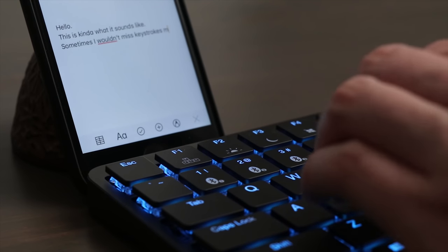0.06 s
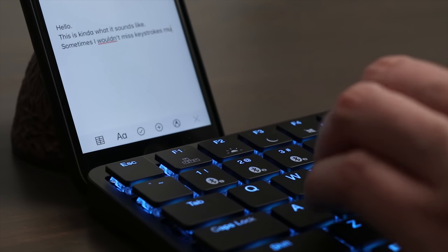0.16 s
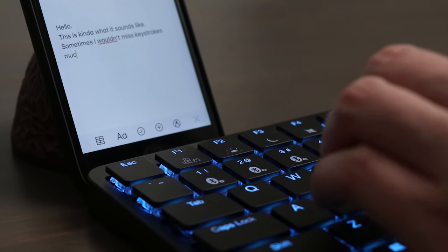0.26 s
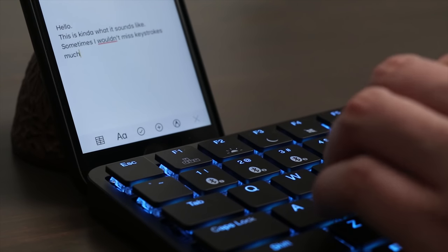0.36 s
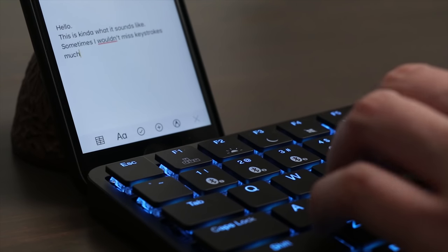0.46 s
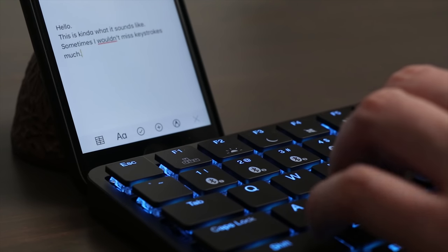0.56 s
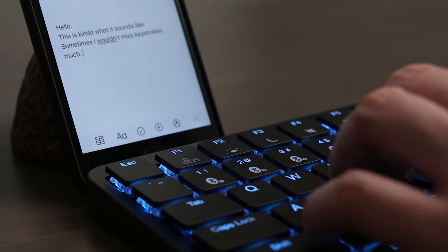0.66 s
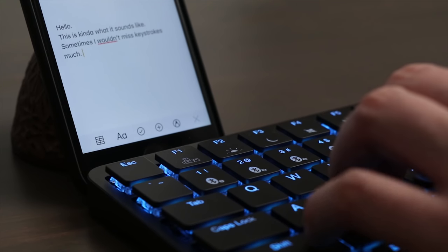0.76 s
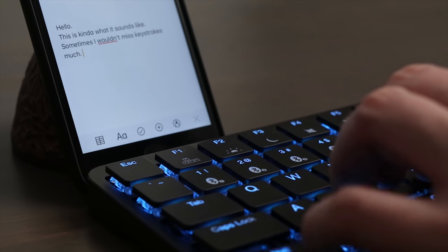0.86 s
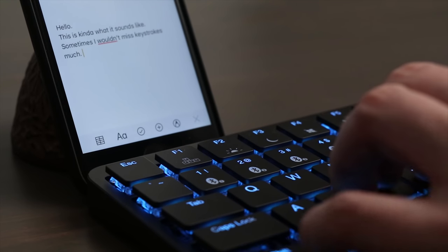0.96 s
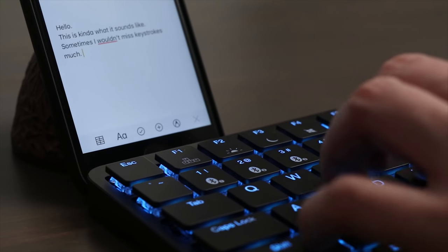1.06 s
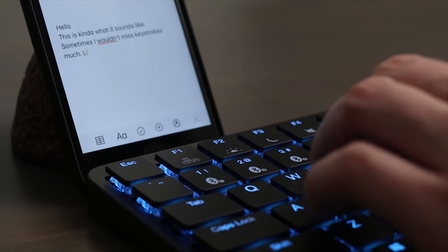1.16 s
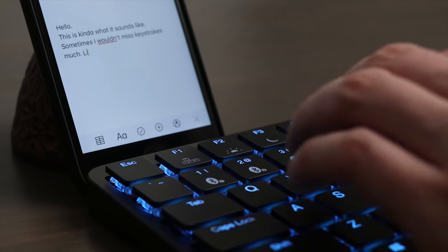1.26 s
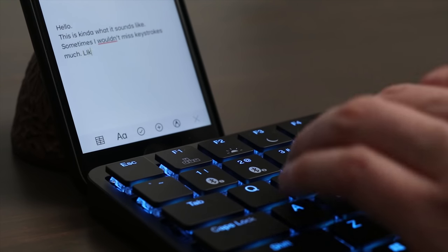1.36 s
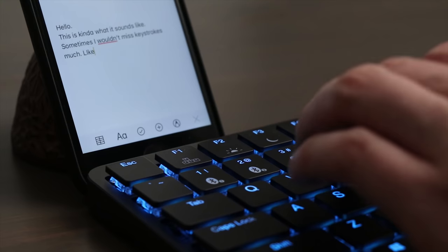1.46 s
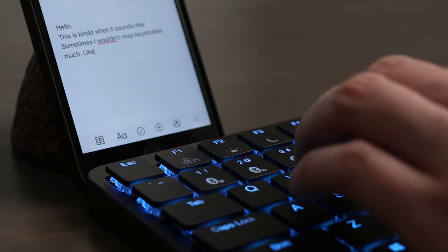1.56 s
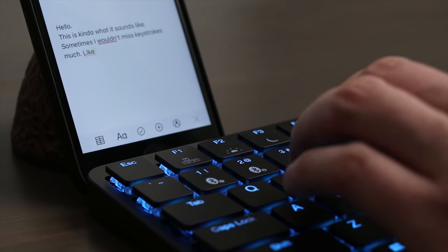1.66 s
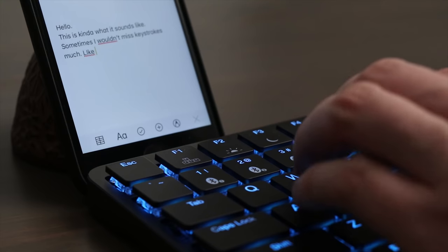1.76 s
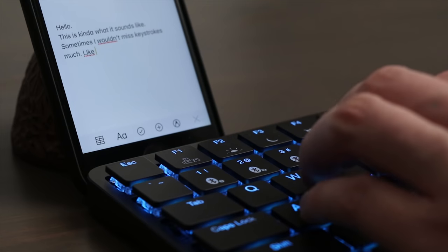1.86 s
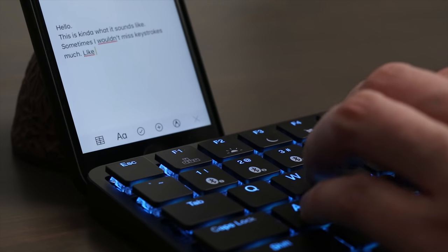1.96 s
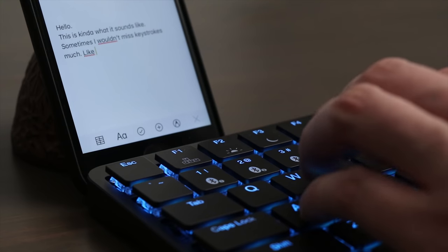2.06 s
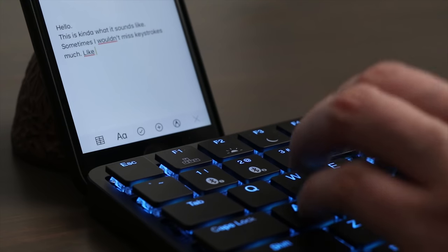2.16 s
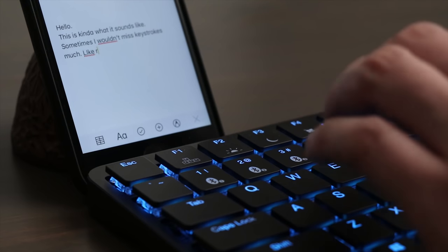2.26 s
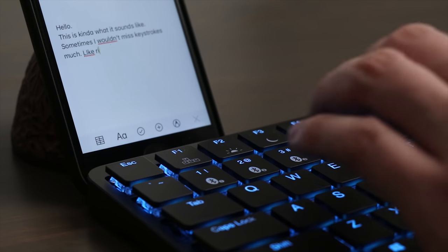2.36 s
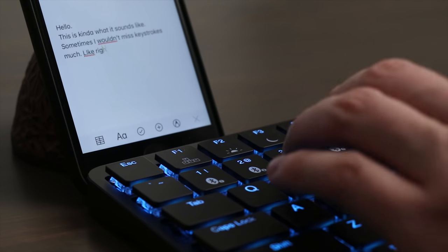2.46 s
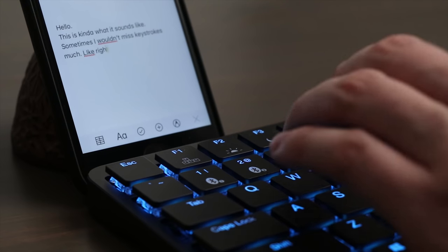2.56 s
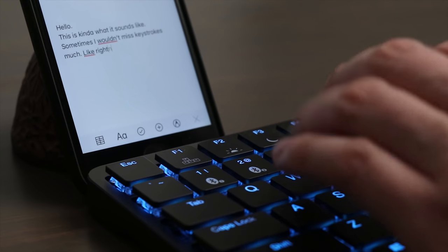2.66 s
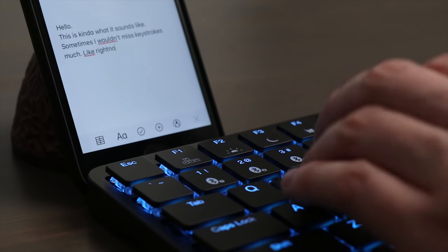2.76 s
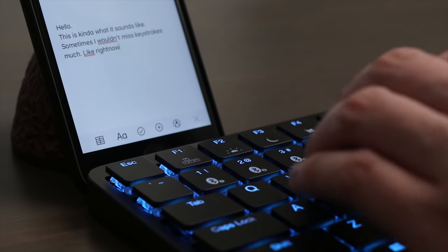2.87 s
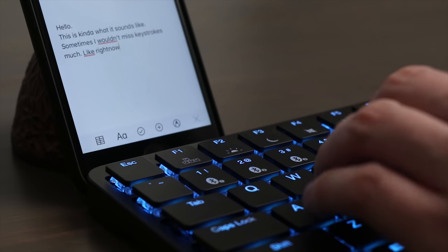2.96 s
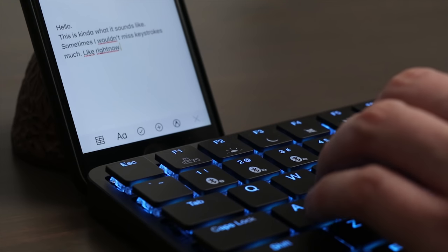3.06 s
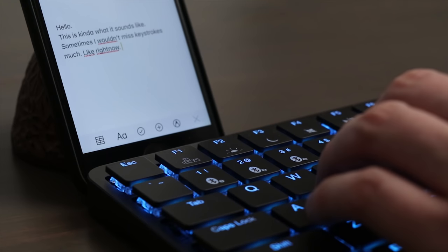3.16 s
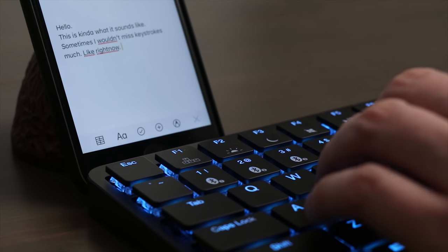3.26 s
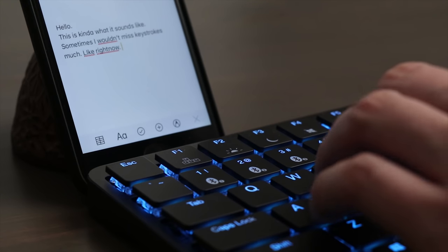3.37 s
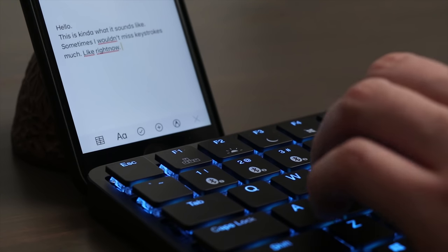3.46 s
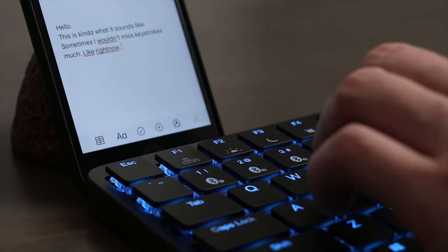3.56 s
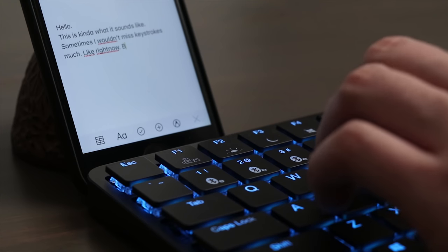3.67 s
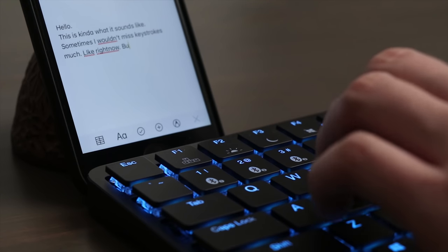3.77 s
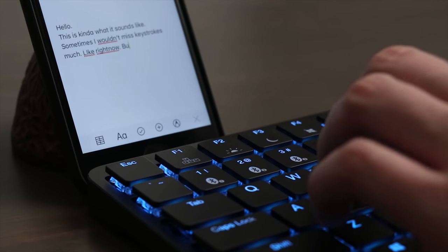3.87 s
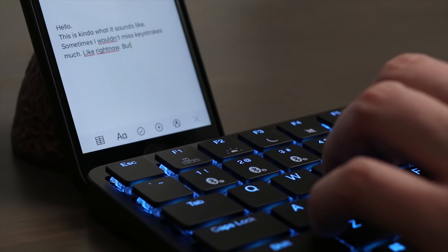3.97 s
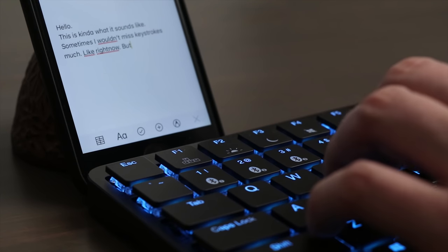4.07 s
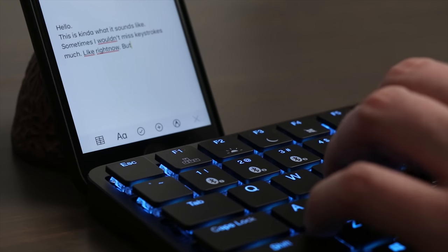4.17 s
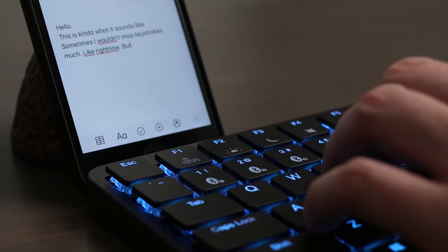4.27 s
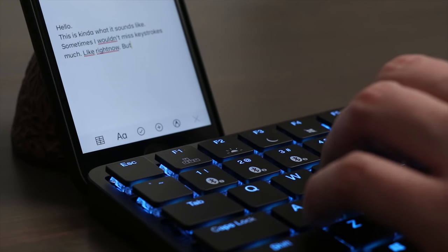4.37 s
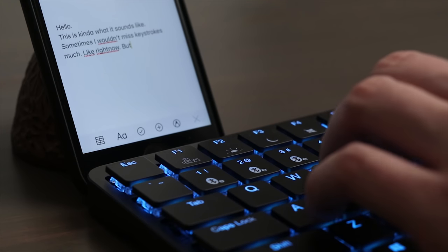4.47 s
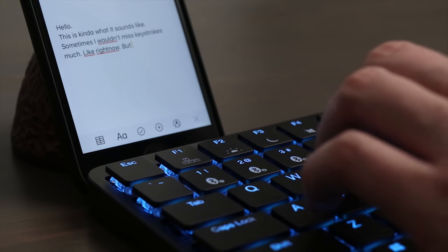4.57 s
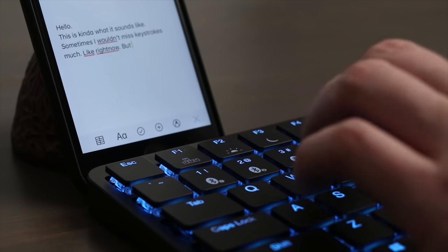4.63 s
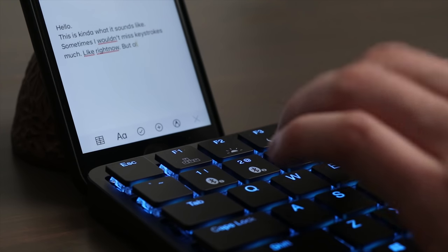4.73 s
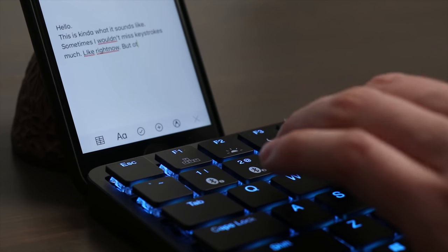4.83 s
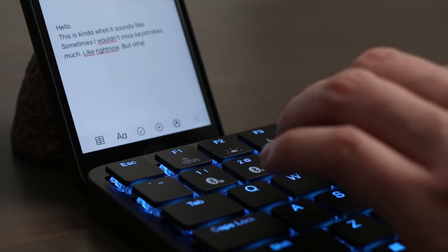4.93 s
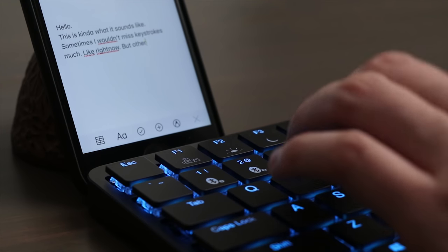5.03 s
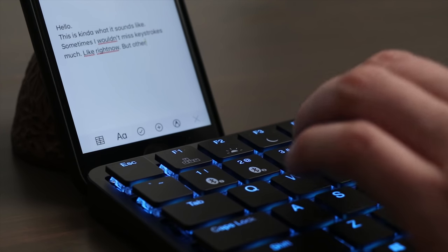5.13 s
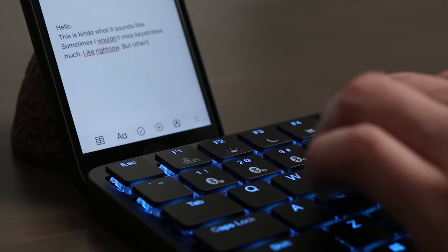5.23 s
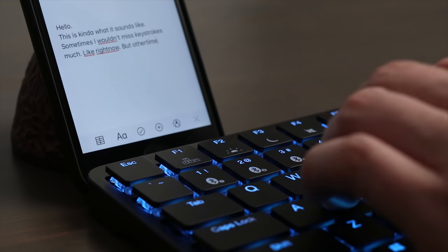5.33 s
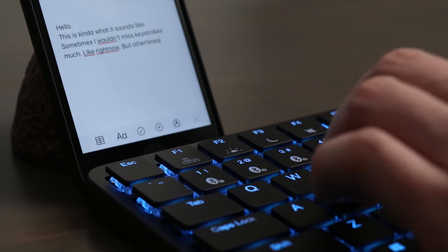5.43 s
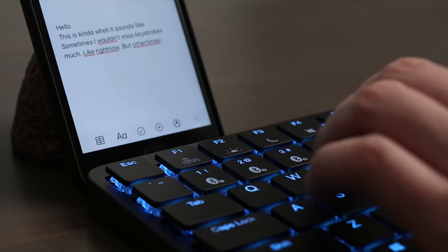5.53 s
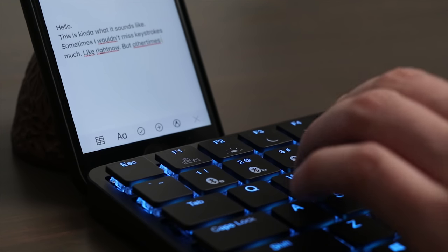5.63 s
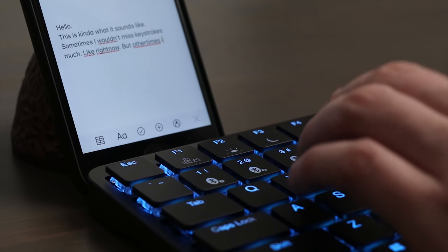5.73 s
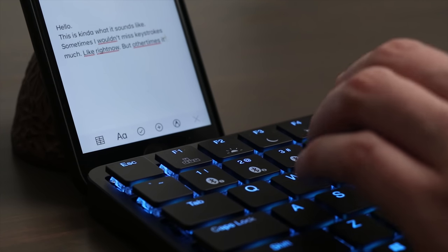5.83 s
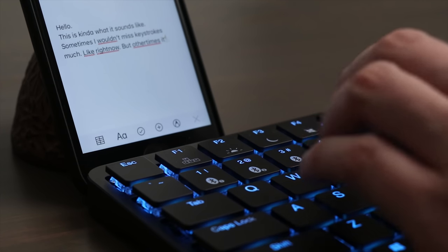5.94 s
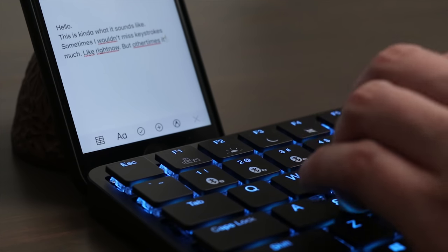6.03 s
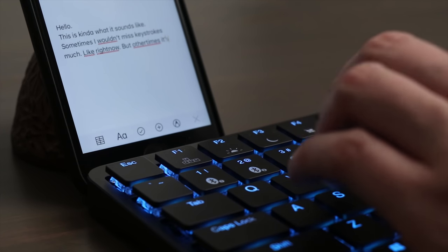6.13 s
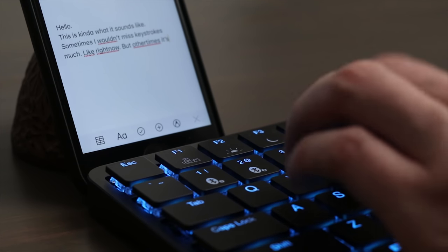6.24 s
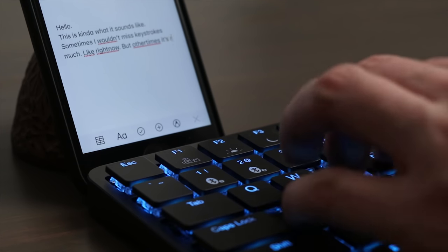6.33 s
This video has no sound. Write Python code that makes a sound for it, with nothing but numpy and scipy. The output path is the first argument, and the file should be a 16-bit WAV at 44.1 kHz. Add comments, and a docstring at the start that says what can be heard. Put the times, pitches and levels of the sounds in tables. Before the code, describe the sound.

A clicky keyboard is typed quickly in a quiet room. Bright snaps and plastic clacks start at once, pause briefly, then return in dense clusters, with doubled clicks as keys go down and spring back. After gaps in the middle, a long busy run leads to the end. Faint spring pings and a thin wire ring linger under the close, central, slightly roomy sound.

```python
"""Fast typing on a clicky keyboard

Keys are struck on a small keyboard on a desk, close to a nearly mono microphone in a quiet room.
Each stroke is a cluster a few ms apart: the click leaf snaps, the keycap knocks, the desk thumps.
These are struck bodies, summed from decaying modes; springs and the wire of a long key ring longer.
Noise tails excited by the blows give the rattle of loose parts and the short reverberation."""
import sys
import numpy as np
from scipy import signal
from scipy.fft import rfft, irfft
from scipy.io import wavfile
from scipy.ndimage import uniform_filter1d

SR = 44100
rng = np.random.default_rng(int(sys.argv[2]) if len(sys.argv) > 2 else 0)


def output_pcm(signal):
    """Save a mono or channel-first signal as 16-bit PCM at the path in sys.argv[1].

    Samples are clipped to [-1, 1] before scaling.
    """
    pcm = np.clip(np.atleast_2d(signal).T, -1, 1) * 32767
    wavfile.write(sys.argv[1], SR, np.round(pcm).astype(np.int16))


N = 282240  # samples


def gain_of(db):
    """Level law: decibels become an amplitude factor."""
    return 10 ** (np.asarray(db) / 20)


def read(points, hz):
    """Logarithmic frequency scale: a table is interpolated along it."""
    f, value = np.transpose(points)
    return np.interp(np.log(hz + 1), np.log(f + 1), value)


def add(mix, s, sound):
    """Superposition: a sound is summed into the mix from a time in seconds."""
    part = mix[max(round(s * SR), 0):][:len(sound)]
    part += sound[:len(part)]


def coloured(x, spectrum):
    """Linear filtering: each frequency is weighted by a spectrum."""
    weight = gain_of(read(spectrum, np.fft.rfftfreq(N, 1 / SR)))
    return irfft(rfft(x) * weight, N)


def ring(modes, chance, seconds, rise_s, spread, loose_db):
    """Modal decay: a blow excites modes varied in pitch, strength and phase; loudest moment at rms 1."""
    hz, db, t60 = np.transpose(modes)[:, :, None]
    detune, strength, phase = chance[:3 * len(modes)].reshape(3, -1, 1)
    t = np.arange(round(seconds * SR)) / SR
    cycles = hz * (1 + spread * (2 * detune - 1)) * t + phase
    level_db = db + loose_db * (2 * strength - 1) - 60 * t / t60
    sound = (gain_of(level_db) * np.sin(2 * np.pi * cycles)).sum(0)
    sound *= (1 - np.exp(-t / rise_s)) ** 2  # contact takes a moment to build
    power = uniform_filter1d(sound ** 2, size=round(4 * rise_s * SR) + 20)
    return sound / np.sqrt(power.max())


# Room and microphone noise, shape only: (frequency [Hz], relative density [dB per Hz])
AIR_SPECTRUM = [(20, 5.5), (50, 2.5), (100, -4), (220, -3), (500, -12.5), (1200, -20), (3000, -22.5),
                (5900, -23), (6350, -21), (6800, -24), (12000, -23.5), (15500, -25.5)]
AIR_DB, HISS_DB = -65, -75.5  # rms: noise shared by the channels, hiss that differs between them


def air():
    """Stationary noise: a coloured part alike in both channels, and white hiss of opposite sign in each."""
    noise, hiss = coloured(rng.standard_normal(N), AIR_SPECTRUM), rng.standard_normal(N)
    return gain_of(AIR_DB) * noise / noise.std() + gain_of(HISS_DB) * np.array([hiss, -hiss])


def tail(x, decays, start_s, half_cycles_per_s=83):
    """Diffuse decay: the sound is convolved with noise whose bands die at their own speeds."""
    size, out = SR // 2, np.zeros(N)
    turn = np.arange(N) / SR * half_cycles_per_s
    for k in range(3):  # three noise sets take turns, so that hits differ
        taps = rng.standard_normal(size) * (np.arange(size) >= start_s * SR)
        hz, t, z = signal.stft(taps, SR, nperseg=128)
        decay = gain_of(-60 * t / read(decays, hz)[:, None])
        taps = signal.istft(z * decay, SR, nperseg=128)[1]
        share = np.sqrt(2 / 3) * np.cos(np.pi * (turn + k / 3))  # squares of the three add to 1
        out += signal.oaconvolve(x * share, taps / np.linalg.norm(taps))[:N]
    return out


# Reverberation of the room: (frequency [Hz], t60 [s])
ROOM_DECAY = [(200, 0.62), (1000, 0.42), (3000, 0.25), (8000, 0.35), (14000, 0.28)]
ROOM_KEYS_DB, ROOM_BOARD_DB, ROOM_THUMPS_DB = -18, -6.0, -8.0


def key_reverberation(keys, shiver):
    """Reverberation: the room answers the keys and the shivering board with dense reflections."""
    sources = gain_of(ROOM_KEYS_DB) * keys + gain_of(ROOM_BOARD_DB) * shiver
    return tail(sources, ROOM_DECAY, start_s=0.0026)


def thump_reverberation(low):
    """Reverberation: the thumps return a little later, the noise sets trading places slowly."""
    return gain_of(ROOM_THUMPS_DB) * tail(low, ROOM_DECAY, start_s=0.006, half_cycles_per_s=2.286)


RATTLE_KEYS_DB, RATTLE_T60 = -15.5, 0.051  # dB, s


def rattle(keys, shiver):
    """Secondary impacts: stem and cap chatter in their guides, with one decay time at every pitch."""
    chatter = [(100, RATTLE_T60), (16000, RATTLE_T60)]
    return tail(gain_of(RATTLE_KEYS_DB) * keys + shiver, chatter, start_s=0.00091)


def uneven_contact():
    """Amplitude modulation: loose parts touch in small bumps a few ms apart."""
    bumps = uniform_filter1d(uniform_filter1d(rng.standard_normal(N), size=110), size=110)
    return gain_of(2.09 * bumps / bumps.std())


# What the whole board scatters when a key is struck: (frequency [Hz], relative density [dB per Hz])
BOARD_SPECTRUM = [(300, -3), (600, -5.5), (1260, 1.5), (1700, -7), (2600, 4), (4200, 1), (6400, -10),
                  (8300, -7.5), (9900, -16.5), (12500, -16.5), (16000, -35)]
BOARD_DB, SNAP_TREBLE_DB = 17, 0.5


def board(leaf, cap):
    """Broadband scattering: blows jolt plate and neighbouring keys; snaps reach more treble."""
    snaps, blows = np.zeros((2, N))
    for s, db, *_ in leaf:
        add(snaps, s, gain_of([db]))
    for s, db, *_ in cap:
        add(blows, s, gain_of([db]))
    treble = np.diff(snaps, prepend=0)  # differentiation favours the treble
    return gain_of(BOARD_DB) * coloured(blows + gain_of(SNAP_TREBLE_DB) * treble, BOARD_SPECTRUM)


def steel(hits, modes):
    """Light damping: thin steel keeps its pitch and dies slowly; two close modes beat."""
    out = np.zeros(N)
    for (s, db), chance in zip(hits, rng.random((len(hits), 6))):
        add(out, s, gain_of(db) * ring(modes, chance, .8, rise_s=.004, spread=0, loose_db=0))
    return out


# A key let go leaves its spring pinging: (time [s], level [dB])
SPRING_PINGS = [(.68, -60), (1.73, -64), (3.134, -58), (5.545, -57), (5.9, -66)]
# Modes of the spring: (frequency [Hz], relative level [dB], t60 [s])
SPRING_MODES = [(1235, 0, .13), (1295, -2, .1)]


def springs():
    """Free vibration: a released spring rings briefly."""
    return steel(SPRING_PINGS, SPRING_MODES)


# Stabiliser wire of a long key set ringing: (time [s], level [dB])
WIRE_HITS = [(2.436, -68), (3.796, -61), (4.62, -75), (5.239, -74), (5.83, -68)]
# Modes of the wire: (frequency [Hz], relative level [dB], t60 [s])
WIRE_MODES = [(959, 0, 1.1), (982, -2, 1.0)]


def wire():
    """Free vibration: the stabiliser wire rings on long after the blow."""
    return steel(WIRE_HITS, WIRE_MODES)


# A key bottoming out pushes case and desk: (time [s], case level [dB], desk level [dB])
THUMPS = [(0.1, -57.5, -66), (0.201, -46, -58), (0.263, -62, -68), (0.289, -57, -70), (0.542, -56.5, -60),
          (0.57, -53, -68), (0.947, -50, -73), (1.034, -51.5, -58), (1.083, -58, -77), (1.295, -48.5, -55),
          (1.392, -52, -60), (1.623, -52.5, -61), (2.188, -58.5, -66), (2.259, -52.5, -55),
          (2.344, -53, -58), (2.408, -59, -60), (2.532, -56.5, -58), (2.616, -56, -63), (2.64, -49.5, -60),
          (2.682, -57, -69), (2.773, -53, -65), (2.958, -49, -62), (2.993, -64, -70), (3.03, -48, -68),
          (3.624, -57, -71), (3.704, -52, -57), (3.84, -58.5, -74), (4.512, -49.5, -65), (4.618, -54, -68),
          (4.682, -60, -62), (4.78, -55, -62), (4.835, -45.5, -58), (4.888, -49, -66), (5.105, -52.5, -58),
          (5.2, -56.5, -64), (5.234, -52.5, -52), (5.28, -51.5, -64), (5.339, -50, -71), (5.39, -56, -73),
          (5.434, -55.5, -68), (5.732, -51, -64), (5.813, -50.5, -67), (6.065, -49, -61), (6.2, -51.5, -66),
          (6.285, -54, -67), (6.327, -52.5, -71), (6.376, -51, -66)]
# Low modes of the case on the desk: (frequency [Hz], relative level [dB], t60 [s])
LOW_CASE_MODES = [(131.4, -2, 0.11), (168.7, -2.5, 0.12), (202.6, 1, 0.096), (228.7, -2.5, 0.15),
                  (263.7, -7.5, 0.08), (311, -1.5, 0.14), (364.5, -5, 0.11), (428.7, 0, 0.076),
                  (532, 0.5, 0.055), (720, -6, 0.071)]
# Lowest modes of the desk top: (frequency [Hz], relative level [dB], t60 [s])
SWAY_MODES = [(77.1, 17.5, 0.33), (48.3, 0.5, 0.19)]


def thumps():
    """Low-frequency modes: the case knocks on many close ones; the desk top sways at its lowest."""
    out = np.zeros(N)
    for (s, db, desk_db), chance in zip(THUMPS, rng.random((len(THUMPS), 36))):
        case = ring(LOW_CASE_MODES, chance, .2, rise_s=.003, spread=.08, loose_db=6.0)
        desk = ring(SWAY_MODES, chance[30:], 0.38, rise_s=0.0035, spread=0.031, loose_db=8.0)
        add(out, s, gain_of(db) * case)
        add(out, s, gain_of(desk_db) * desk)
    return out


# Keycap knocks (finger landing, bottoming out, springing back): (time [s], level [dB],
# cap ring [Hz], case against cap [dB], case ring [Hz])
KNOCKS = [(0.002, -29.5, 2430, -10.5, 1490), (0.099, -33.5, 4150, -15.5, 1340),
          (0.1053, -36, 3230, -8.5, 1480), (0.178, -35.5, 2580, -4.5, 1315),
          (0.195, -35.5, 2670, -11, 1520), (0.2053, -29, 3560, -14, 1120), (0.2693, -42, 2920, -10, 1700),
          (0.2855, -31.5, 3050, -11, 1830), (0.294, -38, 2490, -14, 1620), (0.37, -41, 3050, -1, 1530),
          (0.4792, -34, 3050, -11, 1370), (0.4841, -35.5, 3890, -19, 1220), (0.5405, -44, 3550, -11, 1150),
          (0.5647, -36, 5550, -5.5, 1073), (0.5763, -34.5, 3740, -6.5, 1630), (0.676, -45.5, 4030, 1, 1400),
          (0.918, -45.5, 4750, -23, 1310), (0.9509, -38.5, 2340, -4, 2130), (1.0282, -34, 5100, -18, 1960),
          (1.036, -31.5, 3430, -5.5, 1370), (1.0848, -43.5, 2880, -7, 1370),
          (1.1029, -34.5, 2760, -7, 1720), (1.1363, -36.5, 3180, -4, 1930), (1.1542, -36, 2130, -6, 2140),
          (1.1912, -37.5, 2760, 0, 1740), (1.195, -30, 2540, -9.5, 1110), (1.2788, -38, 3370, -18, 2200),
          (1.2967, -32, 3200, -9.5, 1765), (1.3772, -40.5, 3340, -3, 1790), (1.384, -33, 2220, -2, 2100),
          (1.3899, -29.5, 3200, -11, 1290), (1.3962, -24.5, 2700, -11.5, 900),
          (1.4096, -54, 3280, -17, 1330), (1.4909, -38, 2660, -5.5, 1190),
          (1.6115, -36.5, 3900, -8.5, 1280), (1.6172, -44, 5470, -15, 1020), (1.7243, -45, 3440, -27, 2140),
          (1.7291, -45.5, 3830, 3, 1405), (2.189, -40.5, 3370, -16, 2050), (2.2005, -29, 3260, -6.5, 1570),
          (2.2314, -42.5, 3300, -13, 2100), (2.2552, -31.5, 2600, -21, 1950),
          (2.2617, -21, 2740, -17, 2040), (2.2752, -51, 4850, -10, 1270), (2.2946, -48, 4240, -15, 1220),
          (2.3405, -30.5, 2680, -14, 1010), (2.3532, -27.5, 2810, -23, 2150),
          (2.4002, -35, 3740, -14, 1900), (2.4178, -35, 2950, -19, 2150), (2.4347, -30, 2420, -2, 1466),
          (2.5015, -32.5, 2990, -9.5, 1540), (2.5084, -33.5, 2380, -17, 2130), (2.595, -37, 3870, -9, 1344),
          (2.5963, -42, 2520, 0, 1740), (2.6168, -33, 2920, -8, 1620), (2.6352, -27.5, 3610, -5, 2135),
          (2.6824, -31, 3430, -7, 1640), (2.691, -25.5, 2750, -17, 2040), (2.7538, -37, 2780, -8, 2100),
          (2.768, -32, 3330, -16, 1430), (2.7812, -34.5, 3900, -14, 1640),
          (2.8221, -26.5, 2680, -8.5, 1710), (2.8558, -35, 3340, 0.5, 1550),
          (2.9498, -32.5, 3640, -10.5, 1480), (2.9531, -34.5, 4170, -4.5, 1855),
          (2.9589, -31.5, 2950, -11.5, 1440), (3.0261, -33, 4030, -3, 1143), (3.0637, -33, 3520, -6, 1540),
          (3.1263, -44, 4240, -4, 1430), (3.1312, -48, 2200, 5, 1250), (3.512, -37, 3680, -23, 1320),
          (3.5303, -41.5, 3030, -11, 2100), (3.5953, -39, 2440, -8, 1480), (3.623, -32.5, 3710, -5.5, 2050),
          (3.663, -41, 3700, -6, 2030), (3.704, -34, 2130, 0.5, 2170), (3.713, -31, 2580, -25, 2170),
          (3.7952, -29.5, 3710, -2, 1410), (3.8018, -48, 3830, -9, 1240), (3.8443, -35.5, 2430, -8.5, 1610),
          (3.9298, -53.5, 3240, 6, 1260), (4.4867, -51, 4000, -7, 1590), (4.5062, -37, 3900, -2.5, 1026),
          (4.613, -44, 2950, 2.5, 1410), (4.62, -23.5, 2690, -22, 1820), (4.629, -51, 2700, -2, 1230),
          (4.6843, -32, 3170, -8, 2140), (4.6986, -30, 2490, -8, 1890), (4.7034, -44, 2380, -3, 2150),
          (4.7078, -45, 2300, 0, 1750), (4.758, -33.5, 3070, -11, 1830), (4.7676, -35, 4200, -1.5, 1290),
          (4.779, -31, 3000, -18, 1350), (4.8294, -29, 3080, -10.5, 1440), (4.837, -26.5, 3140, -12, 1530),
          (4.8502, -43, 3310, -6, 970), (4.8866, -29, 3270, -10, 2230), (4.895, -45, 3180, -3, 1540),
          (4.9131, -42, 3020, -6, 2120), (4.95, -37, 2600, -6, 2010), (4.9984, -27, 2690, -4.5, 2070),
          (5.1016, -33, 3050, -7.5, 1640), (5.1119, -30, 3890, -15, 1317), (5.1866, -30, 3260, -10, 2000),
          (5.2046, -31.5, 2700, -7, 1320), (5.2267, -31.5, 3860, -5.5, 2120),
          (5.2318, -31, 3860, -12, 2130), (5.2372, -23.5, 2940, -9, 2100), (5.2515, -48, 3220, -14, 2130),
          (5.2779, -27.5, 3280, -9.5, 2060), (5.2832, -29.5, 2600, -23, 1570),
          (5.2876, -29, 3150, -10, 1840), (5.301, -44, 2950, -14, 1860), (5.344, -28.5, 2630, -11, 1820),
          (5.4003, -37, 2820, -3, 1440), (5.4273, -38, 3680, -29, 1750), (5.4355, -43.5, 3660, -6, 1045),
          (5.4418, -42.5, 2970, -1.5, 934), (5.5958, -33.5, 2590, -15, 1700),
          (5.621, -32.5, 2580, -23, 1740), (5.7018, -32, 2700, -4.5, 1726), (5.7335, -36, 2410, -10, 2170),
          (5.784, -41, 3220, -5.5, 2180), (5.812, -40, 4350, -10, 1670), (5.8287, -42.5, 4070, 2.5, 1338),
          (6.052, -37, 3010, -21, 2090), (6.066, -35.5, 3000, -5.5, 1350), (6.1722, -36, 3140, -7, 2000),
          (6.1917, -42, 4200, -3, 990), (6.2707, -31.5, 3020, -17, 1280), (6.2839, -30, 3020, -9.5, 2080),
          (6.312, -33, 2620, -13, 2130), (6.3168, -41, 2670, -2, 1370), (6.3283, -32, 3970, -7, 1410),
          (6.377, -29.5, 3030, -24, 1960)]
# Modes of the hollow cap: (multiple of cap ring [1], relative level [dB], t60 [s])
CAP_MODES = [(1, 1.5, 0.0093), (.82, -7, 0.0046), (1.2, 0, 0.0063), (1.42, -7.5, 0.0066),
             (1.7, -10, 0.0092), (2.05, -2.5, 0.0046)]
# Modes of the plastic case: (multiple of case ring [1], relative level [dB], t60 [s])
CASE_MODES = [(1, 4, 0.022), (.62, -13, 0.016), (.8, -9.5, 0.057), (1.25, -2.5, 0.02)]
BOUNCE_S, BOUNCE_DB = 0.0064, -22.5  # a cap bounces once, faintly; delay is scaled at random
TRAVEL_S, TRAVEL_DB, TRAVEL_HZ = .008, -22.5, 3600  # the stem ticks in its guide; lead scaled at random
CLICK_CAP_HZ, CLICK_CAP_DB = 4260, -15  # the snap is also heard through its cap
UNDER_SNAP_CASE = (-6.5, 1450)  # the case under a snap: against cap [dB], ring [Hz]


def cap_blows():
    """Impact sequence: knocks, bounces, ticks before snaps and caps under them, in knock columns."""
    late = rng.uniform(0.58, 2.6, len(KNOCKS))
    early = rng.uniform(.5, 2, len(CLICKS))
    bounces = [(s + BOUNCE_S * u, db + BOUNCE_DB, *rings) for (s, db, *rings), u in zip(KNOCKS, late)]
    travel = [(s - TRAVEL_S * u, db + TRAVEL_DB, TRAVEL_HZ, *UNDER_SNAP_CASE)
              for (s, db, _), u in zip(CLICKS, early)]
    under = [(s, db + CLICK_CAP_DB, CLICK_CAP_HZ, *UNDER_SNAP_CASE) for s, db, _ in CLICKS]
    return list(KNOCKS) + bounces + travel + under


def knocks(blows):
    """Coupled bodies: the hollow cap rings at its own pitch; the case answers lower, building slower."""
    out = np.zeros(N)
    for (s, db, cap_hz, case_db, case_hz), chance in zip(blows, rng.random((len(blows), 36))):
        cap_modes = np.multiply(CAP_MODES, [cap_hz, 1, 1])
        case_modes = np.multiply(CASE_MODES, [case_hz, 1, 1])
        cap = ring(cap_modes, chance, .04, rise_s=0.00037, spread=0.07, loose_db=0.0)
        case = ring(case_modes, chance[18:], .04, rise_s=0.00042, spread=0.046, loose_db=10.0)
        add(out, s, gain_of(db) * (cap + gain_of(case_db) * case))
    return out


# Snaps of the click leaf: (time [s], level [dB], upper ring against lower ring [dB])
CLICKS = [(0.0986, -33, 0), (0.1747, -30.5, -8), (0.1951, -30, -10), (0.2015, -28, -5), (0.207, -41, -2),
          (0.276, -33, 1), (0.285, -34, -15), (0.2886, -29, -2), (0.3649, -35, -4), (0.4846, -30, -6),
          (0.5583, -32, -8), (0.5643, -39, -13), (0.5716, -30, -7), (0.6753, -35, -2.5), (0.9449, -29.5, 2),
          (0.9517, -32, -14), (1.0286, -34, -5), (1.0356, -33.5, -5), (1.094, -32, -1), (1.1321, -36, -7),
          (1.1463, -32.5, 0.5), (1.1875, -35.5, -1), (1.1946, -38, -6), (1.2888, -31, -2),
          (1.2969, -38, -7), (1.3705, -33, -3), (1.3956, -23, -4.5), (1.404, -46, -6), (1.486, -30, -2),
          (1.6124, -32.5, -3), (1.6179, -37, -14), (1.7248, -36, 0), (2.1961, -25.5, -6),
          (2.2598, -26.5, -3), (2.2626, -26, -18), (2.3372, -36, -1), (2.3404, -35, -9),
          (2.3497, -29.5, -8), (2.412, -31.5, -4), (2.4175, -43, -7), (2.433, -25.5, -8), (2.4962, -32, -4),
          (2.5058, -35, 4), (2.5914, -32, 1.5), (2.5926, -42, -12), (2.6304, -30.5, -7), (2.688, -43, 7),
          (2.7501, -30, -6), (2.7771, -30.5, 0), (2.8217, -31, -8), (2.8531, -30.5, -4), (2.857, -40, -13),
          (2.9506, -53, -3), (2.9549, -27.5, -8), (3.02, -30, -5), (3.0263, -33, -13), (3.062, -32.5, -1.5),
          (3.1285, -33, -3), (3.5214, -29.5, -5), (3.592, -35, 1), (3.6633, -44, 3), (3.711, -31.5, -4),
          (3.7913, -34.5, -4), (3.837, -29, -1), (3.924, -32, 2), (4.5029, -30, -8), (4.5077, -31.5, -11),
          (4.6064, -34.5, 2), (4.6112, -36, -17), (4.6834, -37, -15), (4.6968, -30, -1.5),
          (4.7647, -31.5, 5), (4.7749, -27.5, -12), (4.8296, -33, -15), (4.8353, -26.5, -4),
          (4.8876, -31, -4), (4.898, -27.5, -5), (4.947, -29, -3), (4.9937, -29.5, -1.5),
          (5.0005, -35, -15), (5.103, -41, -13), (5.1096, -35, 2.5), (5.1985, -30.5, -5), (5.202, -28.5, 0),
          (5.2344, -35.5, 3), (5.2446, -47, -10), (5.2867, -26, -5), (5.2897, -41, -12), (5.3367, -28, -2),
          (5.3394, -32, -11), (5.398, -28.5, -6), (5.4281, -31, -3), (5.4412, -29.5, 3), (5.5387, -31, -6),
          (5.6142, -31.5, -2), (5.6974, -31.5, -5), (5.728, -29, -2), (5.8044, -33, -2.5),
          (5.8261, -31, 0.5), (5.8926, -32.5, -3.5), (6.062, -26, -4.5), (6.0668, -37, -14),
          (6.1675, -29.5, 1.5), (6.173, -45, -7), (6.1859, -28.5, -7), (6.2707, -41, -19),
          (6.2795, -24, -7), (6.3187, -38, 2), (6.323, -32.5, -1), (6.3279, -38, -10), (6.3656, -37, 1),
          (6.3724, -24, -5), (6.3776, -35, -9), (6.3983, -27.5, -4)]
# Lower cluster of leaf modes: (frequency [Hz], relative level [dB], t60 [s])
LEAF_LOW_MODES = [(6540, -25, 0.0039), (7700, -0.5, 0.0034), (8230, 1, 0.006), (8684, 2.5, 0.0042),
                  (9700, -15, 0.0041)]
# Upper cluster of leaf modes: (frequency [Hz], relative level [dB], t60 [s])
LEAF_HIGH_MODES = [(10690, -9.5, 0.0067), (11520, -7.5, 0.0081), (12430, 3.5, 0.0036), (13550, 4, 0.0033),
                   (15130, -8, 0.0057), (16200, -20.5, .006)]
KNOCK_LEAF_DB, KNOCK_UPPER_DB = -15, -6  # a knock also jolts the leaf, mostly its lower ring


def leaf_blows():
    """Shared excitation: snaps, and the leaf jolted by each knock, in the columns of the snaps."""
    jolts = [(s, db + KNOCK_LEAF_DB, KNOCK_UPPER_DB) for s, db, *_ in KNOCKS]
    return list(CLICKS) + jolts


def clicks(blows):
    """Snap-through: the small steel leaf rings in two clusters of modes for a few milliseconds."""
    out = np.zeros(N)
    for (s, db, upper_db), chance in zip(blows, rng.random((len(blows), 36))):
        low = ring(LEAF_LOW_MODES, chance, .02, rise_s=0.0001, spread=0.02, loose_db=15.5)
        high = ring(LEAF_HIGH_MODES, chance[18:], .02, rise_s=0.00013, spread=0.037, loose_db=6.5)
        add(out, s, gain_of(db) * (low + gain_of(upper_db) * high))
    return out


def scene():
    """Superposition: keys, rattle, board, room and steel in the centre, over the noise."""
    leaf, cap = leaf_blows(), cap_blows()
    keys = clicks(leaf) + knocks(cap)
    shiver = board(leaf, cap)
    low = thumps()
    loose = uneven_contact() * (rattle(keys, shiver) + key_reverberation(keys, shiver))
    return keys + loose + low + thump_reverberation(low) + wire() + springs() + air()


EDGE_HZ = 16300  # upper band limit


def record(dry):
    """Band limitation: a linear-phase low-pass removes the highest treble."""
    taps = signal.firwin(255, EDGE_HZ, window=("kaiser", 9), fs=SR)
    return signal.oaconvolve(dry, taps[None], "same")


dry = scene()
out = record(dry)
output_pcm(out)
```